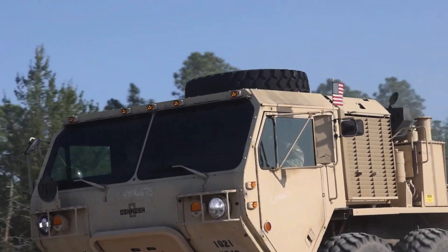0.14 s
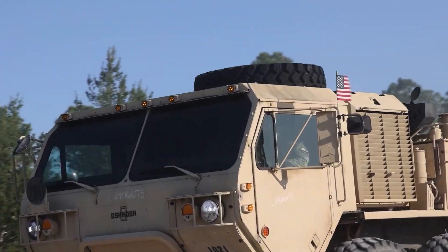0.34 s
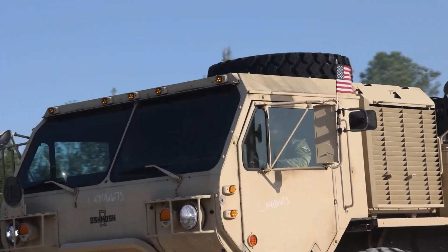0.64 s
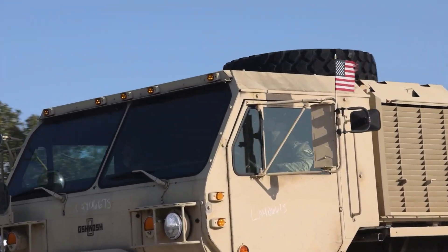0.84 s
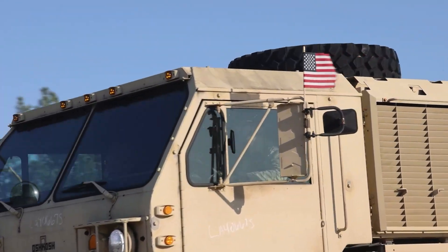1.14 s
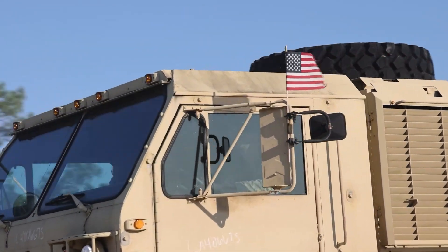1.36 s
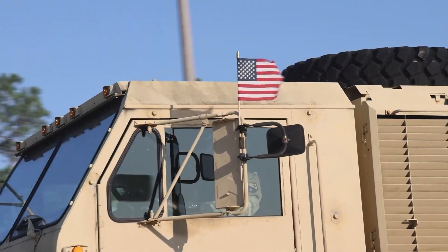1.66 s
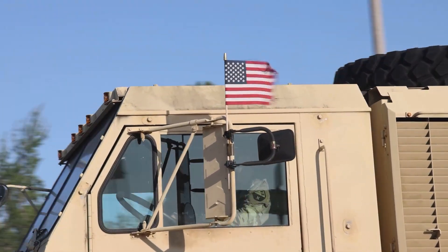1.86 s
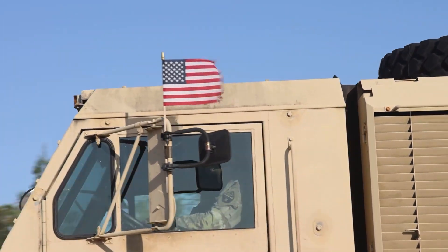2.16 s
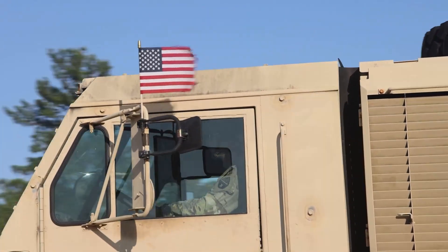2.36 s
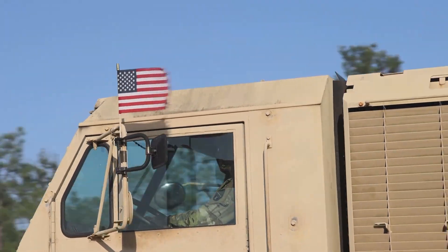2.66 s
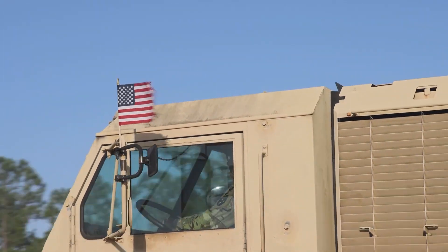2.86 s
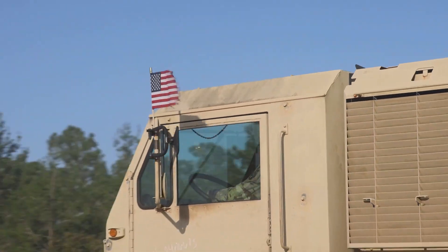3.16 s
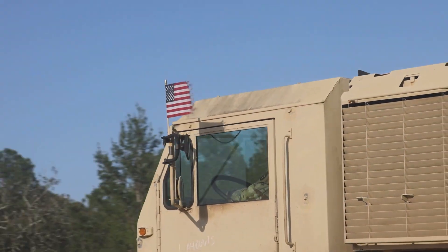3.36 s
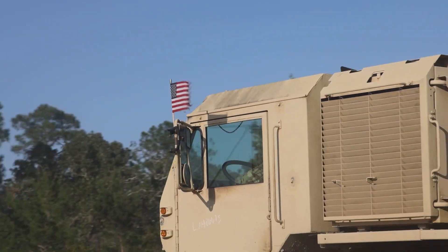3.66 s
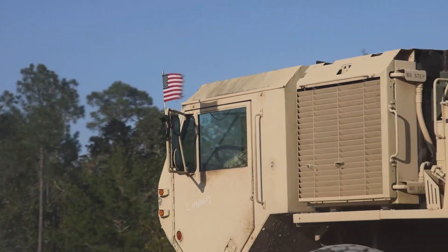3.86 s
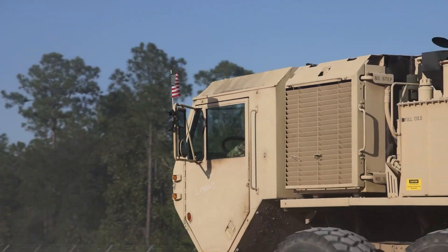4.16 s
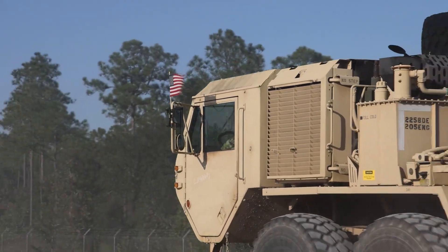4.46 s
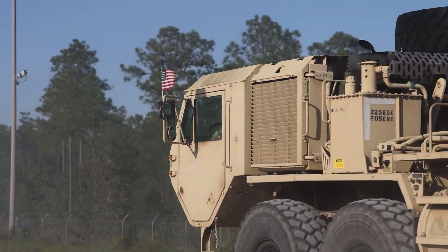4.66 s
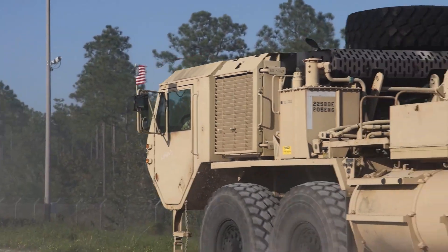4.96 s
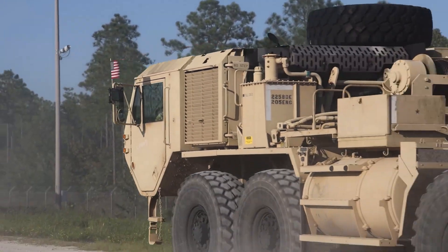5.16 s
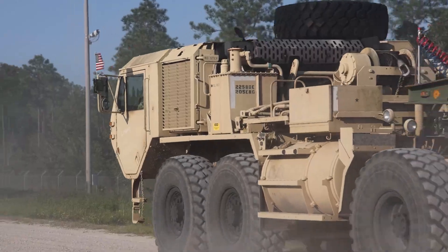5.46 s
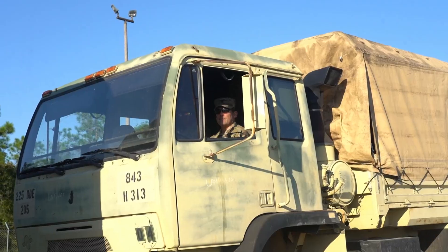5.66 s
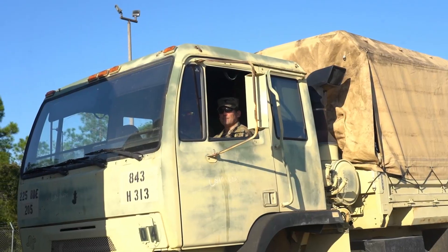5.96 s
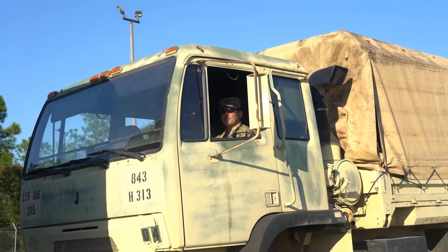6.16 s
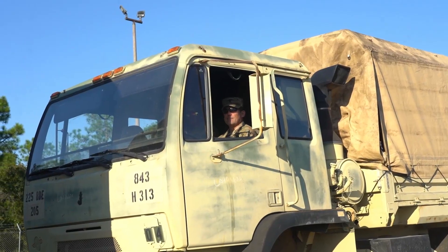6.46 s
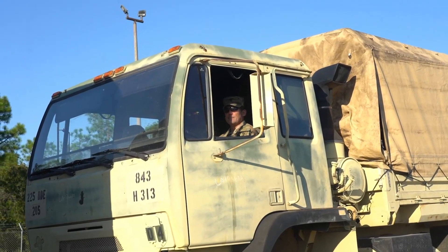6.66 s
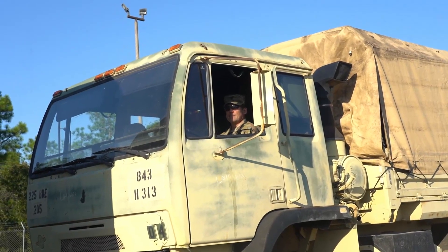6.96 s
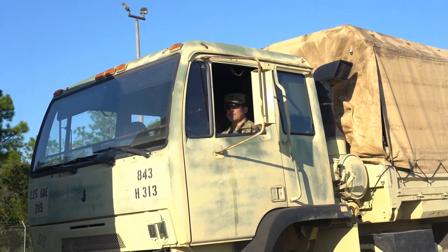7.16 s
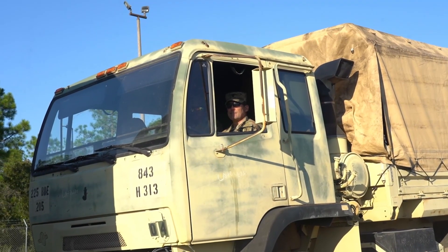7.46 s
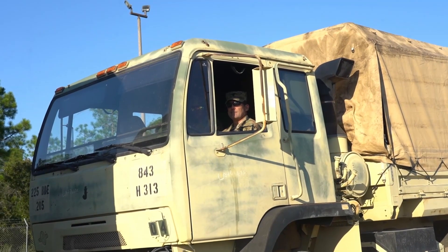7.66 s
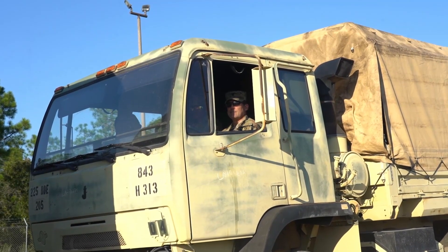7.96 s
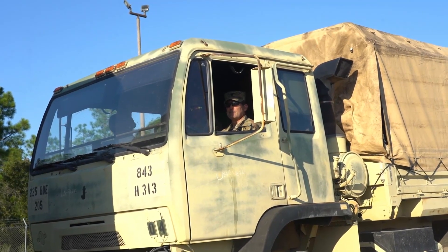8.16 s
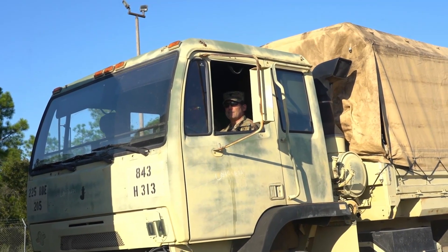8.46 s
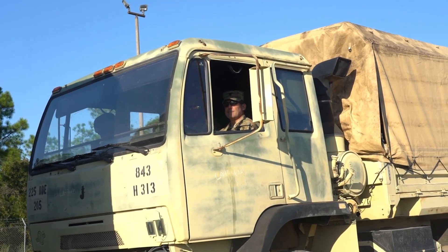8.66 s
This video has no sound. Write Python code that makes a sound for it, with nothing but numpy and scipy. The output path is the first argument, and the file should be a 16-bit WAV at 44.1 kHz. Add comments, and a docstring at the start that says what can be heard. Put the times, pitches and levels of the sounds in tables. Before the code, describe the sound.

Outdoors, a large military truck passes near the microphone with a loud engine and tyre roar, a steady exhaust tone and a wavering gear whine. The tone drops and dies away while something loose rattles brightly and wind thumps on the microphone. After a hard cut, a parked diesel truck idles at a lower level, its rapid, regular clatter continuing to the end.

```python
"""A heavy diesel truck drives past, heard in mono: its firings make the exhaust tone and its gears a whine,
over a low throb and the roar of tyres, fan and engine. From 3.8 s a loose part rattles, while the exhaust
tone sags and dies away. From 4.3 s the eddies of a gust buffet the microphone. At 5.56 s a hard cut
leads to a quieter, stereo scene: a parked truck idles, each firing of its six cylinders ringing the block."""
import sys
import numpy as np
from scipy import signal
from scipy.io import wavfile

SR = 44100
rng = np.random.default_rng(int(sys.argv[2]) if len(sys.argv) > 2 else 0)


def dump_mix(stems):
    """Bounce the given channels to the path in sys.argv[1] as a 16-bit WAV at rate SR."""
    frames = np.atleast_2d(stems).T  # one column per channel
    limited = np.clip(frames, -1, 1)  # hard clip at full scale
    pcm = np.round(limited * 32767).astype(np.int16)
    wavfile.write(sys.argv[1], SR, pcm)


N = 388962
T = np.arange(N) / SR
CUT_S = 5.5605

# Each row: time in seconds, firing rate in Hz, levels of the first and second orders in dB.
STRONG_ORDERS = [(0, 211, -23, -27), (.1, 208.2, -15, -26.5), (.2, 210, -15.5, -46),
                 (.31, 209.8, -15.5, -23), (.5, 210.4, -18, -22.5), (.6, 210.7, -23, -29),
                 (.75, 208.6, -29, -22.5), (.91, 207.9, -21.5, -37), (1.1, 209, -19, -19.5),
                 (1.22, 210, -18.5, -23), (1.4, 210.3, -20, -48), (1.56, 209.3, -31, -32),
                 (1.75, 209.3, -17.5, -50), (1.95, 208.2, -18.5, -24), (2.13, 209, -15, -32.5),
                 (2.28, 208.2, -17, -40), (2.4, 208.3, -17.5, -22), (2.6, 207, -17.5, -26.5),
                 (2.75, 205.3, -18, -20.5), (2.9, 206.6, -18.5, -22), (3.02, 206.8, -32, -31.5),
                 (3.2, 207.8, -27, -34), (3.35, 205.9, -39, -28.5), (3.5, 205.8, -19, -28),
                 (3.7, 201.6, -20, -27), (3.85, 195.4, -19, -28.5), (4.0, 187.9, -20.5, -54),
                 (4.12, 182, -21, -40), (4.3, 179, -18, -41), (4.45, 179.4, -22.5, -47),
                 (4.6, 180, -36, -45)]
# Each row: time in seconds, levels of the third and fourth firing orders in dB.
WEAK_ORDERS = [(0, -42, -41), (.55, -30, -36), (.8, -46, -34), (1.05, -33, -42), (1.2, -36, -45),
               (1.33, -38, -29), (1.55, -40, -35), (1.73, -38, -32), (1.85, -31, -44), (1.97, -29, -42),
               (2.12, -33, -40), (2.3, -41, -38), (2.45, -35, -33), (2.58, -29, -33), (2.8, -44, -34),
               (3.5, -35, -47), (3.9, -34, -48), (4.3, -43, -44)]
# Each row: time in seconds, relative level of the roar's upper three bands in dB, treble tilt in dB.
ROAR_LEVELS = [(0, -18.5, 0.5), (.5, -21, 0.5), (1.13, -18, 2.5), (1.4, -18.5, 3), (1.73, -18.5, 4.5),
               (1.95, -20.5, 5), (2.4, -20.5, 5), (2.83, -22, 4), (3.2, -21.5, 5), (4.2, -23.5, 4.5),
               (4.45, -29.5, 5), (5.1, -31, 0.5), (5.56, -32.5, 5.5)]
# Each row: time in seconds, relative levels of rumble and drone in dB.
RUMBLE_LEVELS = [(0.0, -35, -23.5), (0.24, -34, -29.5), (0.43, -45, -29.5), (0.84, -39, -28.5),
                 (1.28, -41, -32.5), (1.59, -37, -26), (1.76, -40, -27), (1.92, -41, -31.5),
                 (2.12, -48, -31), (3.61, -45, -32.5), (3.92, -40, -35), (4.21, -35, -35), (4.41, -46, -29),
                 (4.68, -42, -29.5), (4.9, -43, -30.5), (5.4, -43, -34)]
# Centres in Hz of the roar's five bands: rumble, drone, body, clatter, hiss.
ROAR_BANDS_HZ = [48, 115, 750, 2300, 8000]
# Factors by which body, clatter and hiss follow the tilt.
TILT_FACTORS = [0.38, 0.31, 1.36]
# Each row: frequency in Hz, relative spectral density in dB.
ROAR_SPECTRUM = [(15, -46), (25, -21), (45, -15), (65, -10.5), (100, -8.5), (150, -2), (196, -6.5),
                 (263, -9.5), (317, -5.5), (414, -9), (473, -4), (619, -9), (1080, -11), (1420, -12),
                 (2480, -17.5), (3080, -23), (5250, -35.5), (11500, -52.5), (14900, -55.5)]
# Each row: frequency of a truck body resonance in Hz, width in Hz, level against the roar in dB.
BODY_MODES = [(1384, 470, -13), (2500, 460, -16), (4800, 1550, -24), (11070, 970, -44.5)]
# Each row: time in seconds, mesh frequency in Hz, level in dB, level of the octave in dB.
GEAR_MESH = [(0, 713, -51, -22), (.15, 728, -46, -33), (.3, 738, -44, -32), (.7, 740, -40, -36),
             (1.0, 767.4, -46.5, -36), (1.3, 781, -39, -42), (1.42, 793, -33, -29), (1.6, 793, -39, -40),
             (1.78, 795, -25, -28), (1.9, 780, -37, -47), (2.05, 773.6, -31, -46), (2.16, 771.5, -29, -45),
             (2.28, 762, -39, -29.5), (2.5, 752, -50, -53), (2.74, 722, -43, -25), (2.86, 711, -25, -40),
             (2.98, 716, -49, -30), (3.1, 715.6, -27, -38), (3.22, 722.4, -36, -39), (3.34, 722, -36, -27),
             (3.46, 702, -28, -31), (3.56, 694.4, -58, -55), (3.7, 690, -63, -70)]
# Each row: time in seconds, level of the ringing heard from behind in dB.
TAIL_RING = [(3.5, -53), (3.8, -31), (4.1, -35), (4.4, -40), (5.0, -45), (5.56, -40)]
# Each row: time in seconds, frequency in Hz, level in dB, level of the octave in dB.
THROB = [(0.05, 46.34, -35, -31), (0.56, 46.5, -39, -39), (0.79, 46.6, -32, -29), (0.81, 46.8, -46, -39),
         (0.9, 46.7, -31, -33), (1.03, 47.9, -42, -39), (1.07, 47.9, -28, -25), (1.15, 47.9, -40, -46),
         (1.19, 47.67, -36, -35), (1.79, 48.1, -28, -29), (2.1, 47.75, -36, -32), (2.7, 44.83, -38, -36.5),
         (3.1, 45.14, -39, -34.5), (3.5, 45.1, -43, -38)]
# Each row: start of a knock of the loose part in seconds, relative level in dB.
RATTLE_KNOCKS = [(3.8005, -28), (3.8594, -26), (3.8976, -33), (3.9223, -27), (3.9508, -34), (3.979, -28),
                 (4.0397, -26), (4.0747, -26), (4.1005, -27), (4.1279, -30), (4.16, -26), (4.2175, -22),
                 (4.2756, -24), (4.3362, -28), (4.3682, -37), (4.3957, -31), (4.4247, -32), (4.4531, -30),
                 (4.4865, -37), (4.5157, -36), (4.574, -32), (4.6387, -35), (4.6941, -37), (4.7524, -38),
                 (4.7814, -38), (4.8093, -32), (4.8742, -41), (4.9305, -47), (4.9605, -41), (4.9904, -39),
                 (5.0458, -36), (5.1066, -41), (5.1386, -39), (5.1615, -39), (5.1949, -40), (5.2827, -38),
                 (5.3401, -40), (5.3965, -48), (5.4558, -37)]
# Each row: frequency in Hz, width in Hz, relative level in dB.
RATTLE_MODES = [(4700, 670, 2.5), (5160, 360, 6.5), (5600, 410, -2), (6050, 430, -18), (7750, 990, -10.5)]
# Each row: time in seconds, relative level of the wind in dB.
GUST = [(4.28, -19), (4.332, -10.5), (4.428, -17.5), (4.46, -11.5), (4.476, -19), (4.492, -11),
        (4.582, -19), (4.628, -11), (4.66, -18), (4.722, -15), (4.738, -16.5), (4.832, -16.5), (4.878, -17),
        (4.892, -15), (4.946, -16), (4.97, -31), (5.01, -33), (5.024, -15), (5.042, -29), (5.084, -28),
        (5.11, -10), (5.182, -13), (5.202, -25), (5.23, -15), (5.248, -29), (5.266, -14), (5.316, -21),
        (5.352, -20), (5.38, -27), (5.394, -19.5), (5.424, -18), (5.438, -24.5), (5.48, -15), (5.502, -18),
        (5.52, -24), (5.56, -20)]
# Each row: frequency in Hz, relative spectral density in dB.
WIND_SPECTRUM = [(24, -48), (40, -20), (97, 2.5), (177, 7), (558, -0.5), (1200, -11.5), (1670, -21),
                 (2000, -6), (2600, -56), (4400, -120)]
# Each row: time in seconds, relative level in dB, nominal frequency in Hz (higher is briefer).
STRONG_EDDIES = [(4.2928, -11, 553), (4.3057, -4.5, 254), (4.3274, -9, 282.4), (4.3335, -4.5, 325.5),
                 (4.3488, -9, 341), (4.3662, -5, 330), (4.3699, -7, 330), (4.381, -9, 348),
                 (4.428, -20, 480), (4.4414, -11, 291), (4.459, -7, 150), (4.484, -5.5, 533),
                 (4.498, -6, 272.8), (4.5225, -9, 448), (4.555, -10, 560), (4.6076, -5, 400),
                 (4.6183, -9.5, 267), (4.6295, -17, 292), (4.6427, -8, 384), (4.6812, -7, 252),
                 (4.6992, -16, 330), (4.7067, -5.5, 420), (4.7236, -4.5, 232), (4.7406, -12, 517),
                 (4.7495, -13, 520), (4.7931, -9, 520), (4.8205, -20, 506), (4.8416, -9, 480),
                 (4.8758, 0, 546), (4.8986, -11, 530), (4.9887, -18, 640), (4.9901, -16, 640),
                 (5.0125, -20, 400), (5.0224, -9, 517), (5.0967, -12, 395), (5.1056, -15, 378),
                 (5.1117, -2, 370), (5.119, -15, 322), (5.1263, -10, 320), (5.1532, -17, 353),
                 (5.1615, -15, 400), (5.1678, -5, 560), (5.1829, -15, 173), (5.2297, -9, 150),
                 (5.2594, -8, 155), (5.2656, -11, 303), (5.276, -6.5, 354), (5.3503, -11, 150),
                 (5.3991, -14, 206), (5.4247, -11.5, 224), (5.4839, -17, 450), (5.522, -8, 150)]
# Each row: frequency in Hz, relative spectral density in dB.
IDLE_SPECTRUM = [(24, -66), (45, -42), (62, -27), (120, -23), (156, -15), (190, -15), (476, -7),
                 (513, -3.5), (657, -3.5), (782, 0.5), (1160, 0), (3630, -9), (4110, -8), (5670, -35),
                 (12800, -26.5), (14900, -36)]
# Centres in Hz of the bands of the diesel knock.
KNOCK_BANDS_HZ = [1100, 2200, 4000, 8000]
# Each row: relative knock strengths of the six cylinders in dB, in one of those bands.
CYLINDER_DB = [(-8, 1, -12, 1, -9, 1), (-2, -9, -2, -3, -2, -2), (-4, -12, 0, -1, 0, -3),
               (-2, 0, -9, 0, -1, -2)]
# Each row: time of a midrange swell of the idle in seconds, rise in dB, half width in seconds.
SURGES = [(7.09, 3.5, 0.033), (8.06, 7, 0.01)]
# Each row: frequency of a block or panel resonance in Hz, width in Hz, level in dB.
BLOCK_MODES = [(522, 59, -60.5), (657, 79, -62), (900, 47, -52.5), (1172, 67, -55), (1242, 90, -50.5),
               (1800, 54, -57), (2430, 60, -59), (2620, 70, -55), (3970, 110, -63), (4175, 430, -50),
               (6270, 2300, -58), (12600, 2100, -66)]
# Each row: frequency of a belt-driven part in Hz, level in dB.
BELT_HUMS = [(511.4, -58), (581.4, -62.5), (654, -61), (663, -55), (683, -62), (1168, -59), (2417, -68),
             (2595, -73)]
# Each row: multiple of half the firing rate, level in dB.
CRANK_ORDERS = [(4, -81), (5, -81), (6, -80), (7, -80), (8, -77), (10, -78), (11, -75), (12, -73),
                (16, -73), (17, -74), (18, -73)]
# Each row: frequency in Hz, correlation of left and right.
COHERENCE = [(60, 0.99), (180, 1), (540, 0.83), (1610, 0.3), (4830, 0.086), (14400, 0.06)]
# Each row: frequency in Hz, left level minus right level in dB.
BALANCE = [(60, 0.0), (180, 0), (540, 2), (1610, 3.5), (4830, 0.5), (14400, -0.5)]


def exhaust(waver=0.002, gone_s=4.62, fade_s=0.046):
    """Periodic firing gives harmonics of the firing rate, which wavers with the crank speed."""
    hz, first_db, second_db = in_time(STRONG_ORDERS)
    hz = hz * (1 + waver * drift(10.3))
    orders = tone(hz, first_db) + tone(2 * hz, second_db)
    for order, db in enumerate(in_time(WEAK_ORDERS), 3):
        orders += tone(order * hz, db + 1.5 * drift(6))
    return orders * np.clip((gone_s - T) / fade_s, 0, 1)


def roar(n, shared_db=0.42, own_db=0.86, level_db=-19):
    """Directivity: the noise of tyres, fan and engine tilts as the truck shows its side, then its tail."""
    db, tilt_db = np.array(in_time(ROAR_LEVELS))[:, :n]
    levels = np.vstack([np.array(in_time(RUMBLE_LEVELS))[:, :n], db + np.outer(TILT_FACTORS, tilt_db)])
    swing_db = levels - levels[:, T[:n] < 4].mean(axis=1, keepdims=True)
    together = drift(8.9)[:n]

    def gain(hz):
        """Gain over time, interpolated between neighbouring bands."""
        index = np.arange(len(levels))
        place = np.interp(np.log(hz), np.log(ROAR_BANDS_HZ), index)
        weights = np.clip(1 - np.abs(place - index), 0, 1)
        return amp(weights @ swing_db + shared_db * together + own_db * drift(18)[:n])

    out = rms_one(sum(x * amp(at_hz(ROAR_SPECTRUM, hz)) * gain(hz) for hz, x in bands((n,))))
    for hz, width, mode_db in BODY_MODES:
        out += amp(mode_db) * rms_one(resonance(rng.standard_normal(n), hz, width)) * gain(hz)
    return out * amp(level_db)


def gear_whine(fade_s=0.2):
    """Meshing teeth radiate a tone and its octave, frequency-modulated by the load."""
    hz, db, octave_db = in_time(GEAR_MESH)
    hz = hz * (1 + 0.0032 * drift(12.7))
    mesh = tone(hz, db + 0.91 * drift(17)) + tone(2 * hz, octave_db + 3.3 * drift(13))
    return mesh * np.clip((GEAR_MESH[-1][0] - T) / fade_s, 0, 1)


def throb(fade_s=0.24, swing_db=0.5):
    """Two low harmonics, slightly modulated, die as the truck turns its tail."""
    hz, db, octave_db = in_time(THROB)
    hz = hz * (1 + 0.0104 * drift(4.4))
    both = tone(hz, db + swing_db * drift(5)) + tone(2 * hz, octave_db + swing_db * drift(5.5))
    return both * np.clip((THROB[-1][0] + fade_s - T) / fade_s, 0, 1)


def tail_ring(hz=1674, width_hz=110):
    """Resonance picks out a narrow band of noise, loudest from behind the truck."""
    return rms_one(resonance(rng.standard_normal(N), hz, width_hz)) * amp(in_time(TAIL_RING)[0])


def rattle(gain_db=7, spread_db=2, rise_s=0.002, t60_s=0.06):
    """Impact excitation: each knock is a noise burst that drives the loose part's modes unequally."""
    starts, db = np.transpose(RATTLE_KNOCKS)
    rise, decay = np.exp(-1 / (rise_s * SR)), amp(-60 / (t60_s * SR))
    scatter_db = spread_db * rng.standard_normal((len(starts), len(RATTLE_MODES)))
    white, out = rng.standard_normal(N), 0
    for k, (hz, width, mode_db) in enumerate(RATTLE_MODES):
        knocks = np.zeros(N)
        knocks[(starts * SR).astype(int)] = amp(db + gain_db + mode_db + scatter_db[:, k])
        envelope = signal.lfilter([1 - rise], np.convolve([1, -rise], [1, -decay]), knocks + 1e-18)
        out += resonance(envelope * white, hz, width)
    return out


def wind(n, lumpy_db=2.5, bed_db=-4.5):
    """Turbulence at the microphone gives lumpy low noise, from which single eddies stand out."""
    gust_db = in_time(GUST)[0]
    lumps = amp(lumpy_db * drift(74)[:n])
    noise = sum(x * amp(at_hz(WIND_SPECTRUM, hz)) for hz, x in bands((n,), top_hz=1800))
    onset = np.clip((T[:n] - GUST[0][0]) / 0.022, 0, 1)
    return rms_one(noise * lumps) * amp(gust_db[:n] + bed_db) * onset + eddies(n, gust_db)


def eddies(n, gust_db, per_s=26, suction=0.8, shortness=5.9, gain_db=2):
    """Each eddy is a pressure pulse: a dip, then a push that leaks away and so rebounds."""
    chance = rng.random((120, 3))
    times = GUST[0][0] + 0.037 - np.cumsum(np.log(chance[:, 0])) / per_s   # Poisson arrivals
    levels = gust_db[np.minimum(times * SR, n).astype(int)] + 2.5 - 8 * chance[:, 1]
    small_eddies = np.c_[times, levels, 160 + 260 * chance[:, 2]][times < CUT_S]
    pressure, first = np.zeros(n), 4 * SR
    for s, db, hz in [*STRONG_EDDIES, *small_eddies]:
        u = (T[first:n] - s) * hz * shortness
        pressure[first:] += amp(db + gain_db) * (np.exp(-u ** 2) - suction * np.exp(-(u + 2) ** 2))
    leaked = low_cut(pressure + 1e-18, hz=130)
    return low_cut(leaked, hz=70)


def idle(n, firing_hz=34.97, first_s=5.563, spread_db=1.5, t60_s=0.055, noise_db=-39.5, looped_share=0.53):
    """Amplitude modulation: noise swells at each firing and drives the resonances of the block."""
    firings = np.maximum((T[-n:] - first_s) * firing_hz + 0.033 * drift(1.5)[-n:], 0)
    count = firings.astype(int)
    strength = amp(spread_db * rng.standard_normal(count[-1] + 1)[count])
    knock = strength * amp(-60 * (firings % 1) / firing_hz / t60_s)
    lumps_db = 0.07 * drift(22)[-n:]
    surge_db = sum(db * np.exp(-((T[-n:] - s) / width) ** 2) for s, db, width in SURGES)

    def envelope(hz):
        """Modulation at one frequency; each cylinder knocks with its own strength."""
        depth = at_hz([(1500, 0.85), (3750, 0.75)], hz)
        cylinders = amp([np.interp(hz, KNOCK_BANDS_HZ, column) for column in np.transpose(CYLINDER_DB)])
        pulses = rms_one(1 + depth * cylinders[count % 6] * knock)
        surge_share = np.exp(-(np.log2(hz / 1170) / 0.35) ** 2)   # a bell curve around 1170 Hz
        return pulses * amp(0.9 * drift(6.9)[-n:] + lumps_db + surge_db * surge_share)

    noise = sum(stereo(x, hz) * amp(at_hz(IDLE_SPECTRUM, hz)) * envelope(hz) for hz, x in bands((2, n)))
    out = rms_one(noise) * amp(noise_db)
    # Part of the contact noise repeats in every engine cycle of six firings.
    cycle = rng.standard_normal((2, round(6 * SR / firing_hz)))
    looped = np.tile(cycle, (1, count[-1] // 6 + 2))[:, :n]
    contacts = np.sqrt(looped_share) * looped + np.sqrt(1 - looped_share) * rng.standard_normal((2, n))
    for hz, width, db in BLOCK_MODES:
        out += amp(db) * stereo(rms_one(resonance(contacts * envelope(hz), hz, width)), hz)
    return out + belt_hums(n) + crank_tones(firings)


def belt_hums(n):
    """Rotating belt-driven parts each radiate a tone that wavers in pitch and level."""
    out = 0
    for hz, db in BELT_HUMS:
        hum = tone(hz * (1 + 0.00138 * drift(4.06)), db + 2.3 * drift(19))
        out += hum[-n:] * pan(hz)
    return out


def crank_tones(firings):
    """Faint harmonics of half the firing rate are phase-locked to the crank."""
    return sum(np.sqrt(2) * amp(db) * np.sin(np.pi * order * firings + 2 * np.pi * rng.random())
               for order, db in CRANK_ORDERS)


def amp(db):
    """Amplitude ratio of a level in dB."""
    return 10 ** (np.asarray(db) / 20)


def rms_one(x):
    """Normalisation to rms 1."""
    return x / np.sqrt(np.mean(x ** 2) + 1e-20)


def in_time(rows):
    """Linear interpolation of a table's columns at every sample."""
    times, *columns = np.transpose(rows)
    return [np.interp(T, times, column) for column in columns]


def at_hz(points, hz):
    """Interpolation on a log-frequency axis."""
    frequencies, values = np.transpose(points)
    return np.interp(np.log(hz), np.log(frequencies), values)


def drift(hz):
    """Low-passed noise gives a slow random fluctuation of rms 1."""
    r = np.exp(-80 * np.pi * hz / SR)   # pole at one step per 40 samples
    slow = signal.lfilter([1], [1, -2 * r, r * r], rng.standard_normal(N // 40 + 2002))[2000:]
    return np.interp(np.arange(N) / 40, np.arange(len(slow)), rms_one(slow))


def tone(hz, level_db):
    """A sine whose phase is the integral of its frequency."""
    return np.sqrt(2) * amp(level_db) * np.sin(2 * np.pi * (np.cumsum(hz) / SR + rng.random()))


def resonance(x, hz, width_hz):
    """A two-pole resonator of peak gain 1, applied twice for steep skirts."""
    r = np.exp(-np.pi * width_hz / SR)
    b = np.array([1, 0, -1]) * (1 - r * r) / 2
    a = [1, -2 * r * np.cos(2 * np.pi * hz / SR), r * r]
    return signal.lfilter(b, a, signal.lfilter(b, a, x))


def low_cut(x, hz, order=1):
    """A high-pass filter."""
    return signal.sosfilt(signal.butter(order, hz, "high", fs=SR, output="sos"), x)


def bands(shape, top_hz=16000):
    """Third-octave noise bands, neighbours uncorrelated. Yields centre in Hz and noise."""
    white, edges = rng.standard_normal((2, *shape)), np.geomspace(24, 16000, 29)
    for k, (low, high) in enumerate(zip(edges, edges[1:])):
        if low < top_hz:
            band = signal.butter(2, [low, high], "band", fs=SR, output="sos")
            yield np.sqrt(low * high), signal.sosfilt(band, white[k % 2])


def pan(hz):
    """Left and right gains: a level difference draws the midrange to the left."""
    return amp(at_hz(BALANCE, hz) * np.array([[0.5], [-0.5]]))


def stereo(noise, hz):
    """Partial coherence: a weighted sum and difference of two noises, most alike in the bass."""
    alike = at_hz(COHERENCE, hz)
    mid, side = np.sqrt(1 + alike) * noise[0], np.sqrt(1 - alike) * noise[1]
    return np.array([mid + side, mid - side]) * pan(hz) / np.sqrt(2)


def scene():
    """The passing truck in mono, then the idling one, whose sound reaches the right side sooner."""
    cut = round(CUT_S * SR)
    passing = (exhaust() + throb() + gear_whine() + tail_ring() + rattle())[:cut] + roar(cut) + wind(cut)
    left, right = idle(N - cut)
    return np.hstack([np.tile(passing, (2, 1)), [np.roll(left, 2), right]])


def record(dry, top_hz=15000):
    """Band limiting and overload: rumble is cut, peaks clip at full scale, and the top is cut."""
    clipped = np.clip(low_cut(dry, hz=36, order=2), -1, 1)
    return signal.sosfilt(signal.ellip(12, 0.5, 75, top_hz, fs=SR, output="sos"), clipped)


dry = scene()
out = record(dry)
dump_mix(out)
```